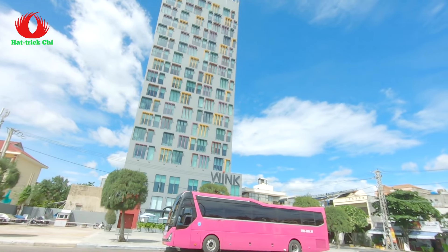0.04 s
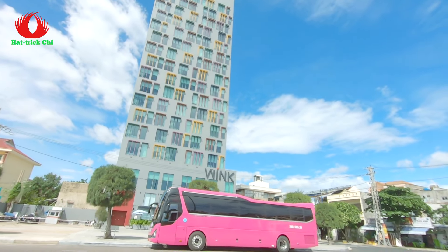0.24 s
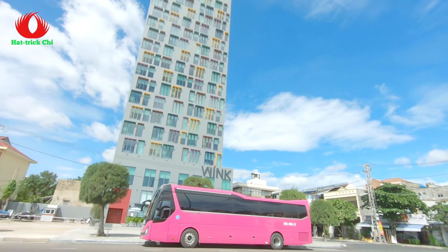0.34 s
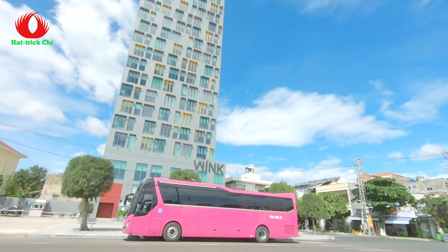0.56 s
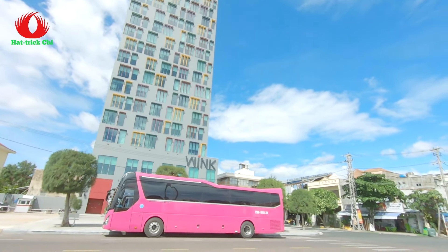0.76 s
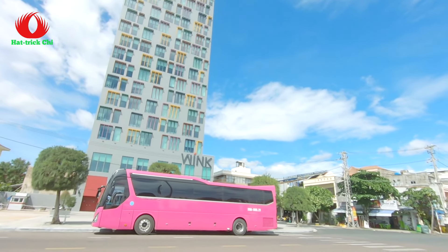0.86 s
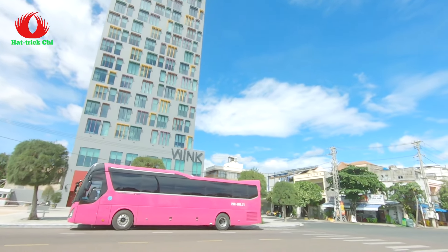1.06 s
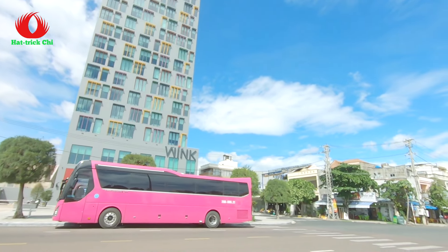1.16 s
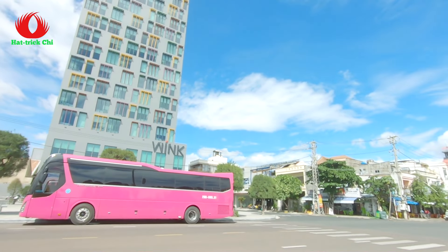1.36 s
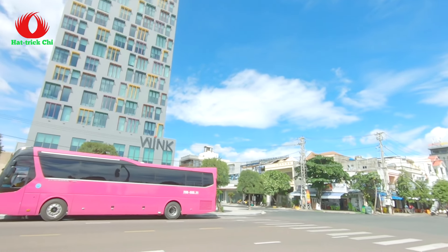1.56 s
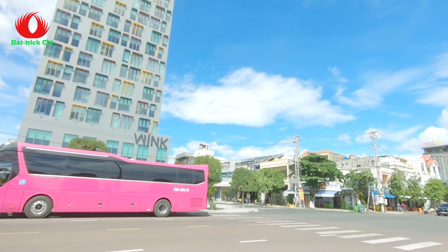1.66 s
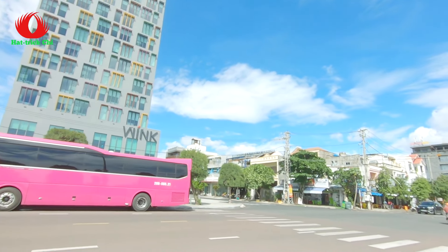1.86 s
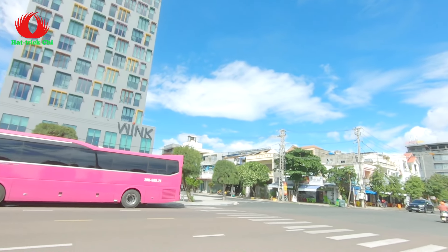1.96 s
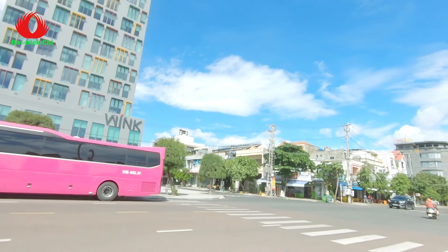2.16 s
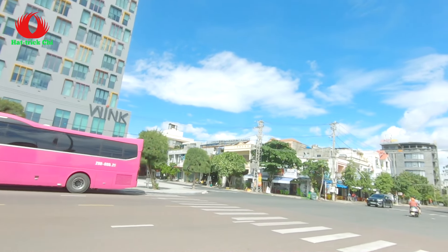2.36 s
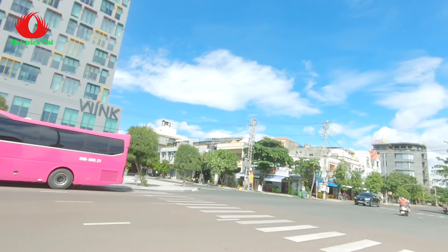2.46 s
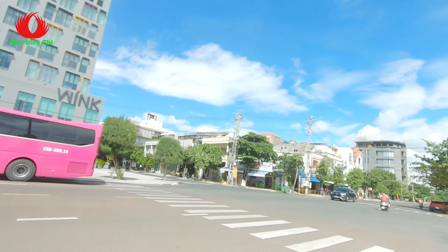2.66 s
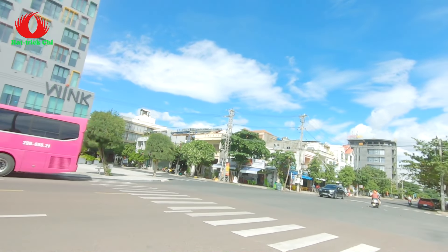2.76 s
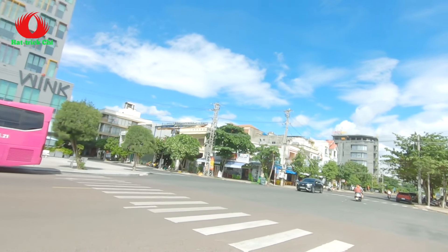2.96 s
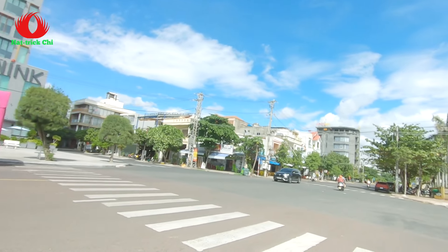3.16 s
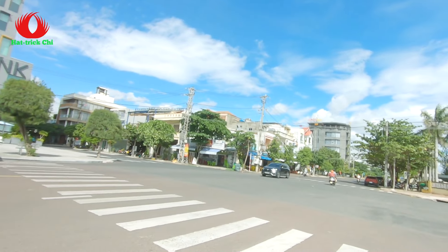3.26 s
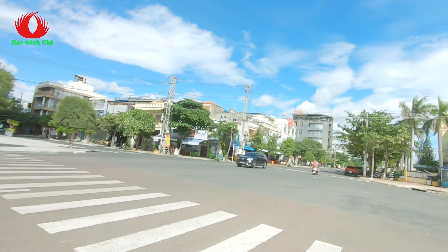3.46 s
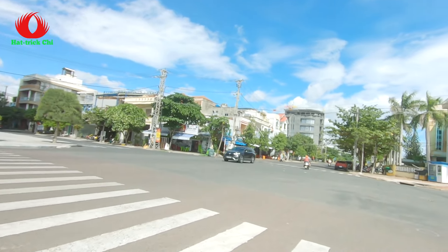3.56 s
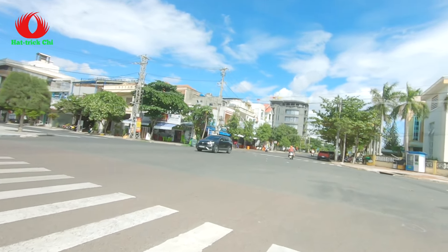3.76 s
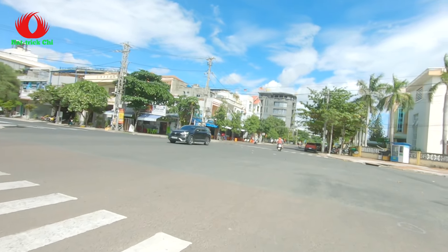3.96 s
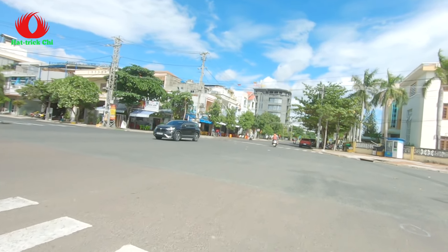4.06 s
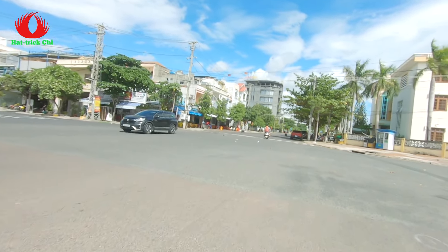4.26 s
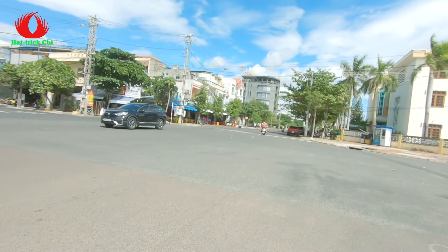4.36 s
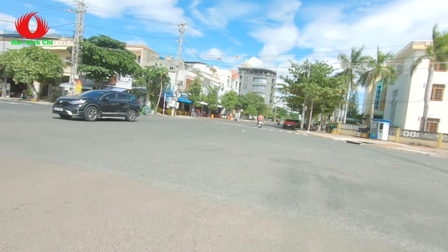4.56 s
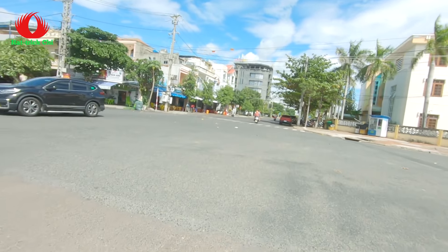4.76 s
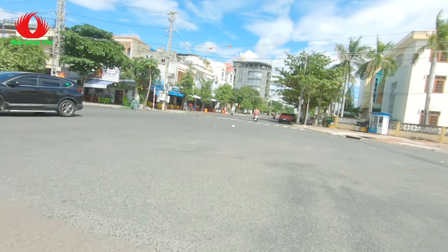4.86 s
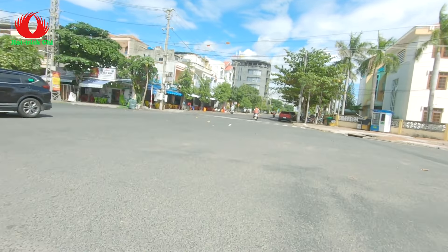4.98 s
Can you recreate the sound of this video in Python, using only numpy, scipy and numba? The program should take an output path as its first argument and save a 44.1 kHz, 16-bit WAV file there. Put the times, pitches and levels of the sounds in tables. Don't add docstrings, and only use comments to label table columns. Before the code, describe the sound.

Outdoors at a wide street crossing, a one-cylinder motorbike idles right beside a small camera microphone. Rapid low thumps, about twenty-one a second, carry valve clatter and thin chain hiss. Gusts slap and rumble over the microphone, ducking the engine. A tiny distant horn toot comes almost at once. The engine softens around one second, returns, shifts in brightness, dips near the end and swells again.

```python
import sys
import numpy as np
from scipy import signal
from scipy.fft import rfft, irfft, next_fast_len
from scipy.io import wavfile
from scipy.ndimage import uniform_filter1d
from numba import njit

SR = 44100
rng = np.random.default_rng(int(sys.argv[2]) if len(sys.argv) > 2 else 0)


def materialize(psi):
    bounded = np.clip(np.atleast_2d(psi).T, -1, 1)
    quanta = np.round(bounded * 32767).astype(np.int16)
    wavfile.write(sys.argv[1], SR, quanta)


def linear_from_db(decibels):
    return 10 ** (np.asarray(decibels, float) / 20)


N = 349713

# [t/s, firing rate/Hz]
FIRING_RATE = [(0.0, 21.0), (0.25, 21.43), (0.9, 21.13), (1.3, 20.95), (1.75, 21.02), (2.1, 20.66),
               (2.5, 20.94), (4.7, 21.03), (5.1, 21.32), (5.5, 21.65), (6.7, 21.75), (6.85, 21.52),
               (7.15, 20.53), (7.5, 20.98), (7.93, 20.48)]


def unit(x):
    return x / np.sqrt(np.mean(x ** 2))


def curves(table):
    s, *columns = np.transpose(table)
    return [np.interp(np.arange(N) / SR, s, c) for c in columns]


def spell(start, end, rise, fall):
    return np.interp(np.arange(N) / SR, [start - rise, start, end, end + fall], [0, 1, 1, 0])


def band(x, lo_hz, hi_hz, order=2):
    return signal.sosfilt(signal.butter(order, [lo_hz, hi_hz], "band", fs=SR, output="sos"), x)


def walk(rate):
    k = int(SR / rate)
    steps = np.repeat(rng.standard_normal(N // 150), k)[:N]
    return 0.75 * uniform_filter1d(uniform_filter1d(steps, k), k)


def flutter(rate):
    steps = walk(rate)
    return steps - uniform_filter1d(steps, size=SR // 5)


def patchy(spectrum, flicker_db, rate, ref_lo_hz, ref_hi_hz, count):
    size = next_fast_len(N)
    hz = np.arange(size // 2 + 1) * SR / size + 1e-3
    f, db = np.transpose(spectrum)
    colour = linear_from_db(np.interp(np.log(hz), np.log(f), db, left=-200))
    place = (count - 1) * np.log(hz / f[0]) / np.log(f[-1] / f[0])
    noise = rfft(rng.standard_normal(size)) * colour
    out = np.zeros(N)
    for k in range(count):
        share = np.clip(1 - abs(place - k), 0, 1)
        out += linear_from_db(flicker_db * walk(rate)) * irfft(noise * share, size)[:N]
    in_reference = (hz > ref_lo_hz) & (hz < ref_hi_hz)
    return out / np.sqrt(2 * np.sum(colour[in_reference] ** 2) / size)


def singing(modes, quick_db, slow_db):
    white = rng.standard_normal(N)
    out = np.zeros(N)
    for hz, w, db in modes:
        gain = linear_from_db(db + quick_db * walk(21.96) + slow_db * walk(0.83))
        out += gain * unit(band(white, hz - w / 2, hz + w / 2))
    return out


def burst(cycle, at, length, db, scatter_db):
    turn = cycle - at + .5
    size = linear_from_db(db + scatter_db * np.tanh(rng.standard_normal(N // 1000)))[turn.astype(int)]
    return size * np.exp(-.5 * ((turn % 1 - .5) / length) ** 2)


def nearness():
    # [t/s, valve level/dB, chain side facing/dB]
    engine = [(0, -40.5, 0.5), (.48, -39.5, -1), (.54, -43, -3), (1.15, -47, -2), (1.55, -44.5, -2),
              (2.0, -42.5, -2.5), (2.25, -39.5, -3), (3.05, -40, -1), (3.65, -39.5, -3.5),
              (3.75, -40.5, -3.5), (4.3, -43.5, -1.5), (4.65, -45, -2.5), (4.95, -40.5, -2),
              (5.15, -38, -3), (6.12, -38.5, -2.5), (6.22, -39.5, -4), (6.5, -42, -2), (7.3, -38.5, -2.5),
              (7.52, -47, -3.5)]
    level_db, facing_db = curves(engine)
    after_last_lean = np.clip(np.arange(N) / SR - engine[-1][0], 0, None)
    return level_db + 12 * after_last_lean, facing_db


def thump_db():
    sag = np.clip(-np.gradient(curves(FIRING_RATE)[0]) * SR - 1, 0, None)
    return nearness()[0] + 15.4 - 1.2 * uniform_filter1d(sag, size=8000)


def exhaust(cycle):
    # [multiple of the firing rate, level/dB]
    overtones = [(2, -20), (3, -19), (4, -4), (5, -1), (6, 0), (7, -3), (8, -13), (9, -19), (11, -21),
                 (12, -8), (13, -12), (14, -15), (15, -14), (16, -11), (17, -17), (18, -19), (22, -22)]
    turn = 2 * np.pi * (cycle + .03 + .002 * walk(12))
    pulse = np.zeros(N)
    for k, db in overtones:
        phase = -.7 if k < 10 else np.pi + .2 * (k - 10)
        pulse += linear_from_db(db) * np.cos(k * turn + phase)
    return unit(pulse) * linear_from_db(thump_db() + .8 + .9 * flutter(21))


def casing(cycle, shuts):
    # [f/Hz, level per Hz/dB]
    casing_colour = [(150, -37), (215, -52), (255, -7), (335, 1), (405, -3.5), (500, 0.5), (640, -4.5),
                     (830, -2), (1010, -4), (1110, -12), (1300, -11.5), (1700, -60)]
    # [f/Hz, width/Hz, level/dB]
    covers = [(498, 41, -20), (850.3, 56, -8), (928, 81, -11), (1334, 67, -18.5), (2143, 48, -22)]
    level_db, facing_db = nearness()
    drone = patchy(casing_colour, .8, 12, 600, 1100, count=6) + singing(covers, 3.0, 1.5)
    swell = .88 + shuts * .8 + .11 * np.cos(2 * np.pi * (cycle - .42))
    return linear_from_db(level_db + 5.8 - 0.61 * facing_db) * drone * swell


def valves(opens, shuts, fires):
    # [f/Hz, level per Hz/dB]
    valve_colour = [(620, 1.5), (1050, -14), (1120, -48), (1330, -2), (1540, -5), (1830, -3.5), (2190, -10),
                    (2420, -13), (2640, -13.5), (2880, -15), (3150, -15.5), (3760, -22.5), (4080, -23),
                    (4430, -31), (4710, -33), (5400, -34), (7020, -58), (11900, -120)]
    clatter = patchy(valve_colour, 0.99, 21.14, 1150, 2320, count=7)
    seating = 1.3 * shuts * band(clatter, 2900, 6000)
    return linear_from_db(nearness()[0]) * (clatter * (.82 + .8 * opens + .75 * fires) + seating)


def chain(opens, fires):
    # [f/Hz, level per Hz/dB]
    hiss_colour = [(2760, -40), (4700, -37), (5190, -10.5), (6290, 3.5), (6920, -1), (7230, 2.5),
                   (7500, -4.5), (7780, -2), (8990, -4), (9800, -20), (12700, -35), (21600, -120)]
    # [f/Hz, width/Hz, level above hiss/dB]
    link_modes = [(6525, 70, -8), (6680, 90, -13), (7310, 110, -8), (9080, 120, -13), (9910, 60, -22),
                  (11510, 160, -15), (13030, 120, -18)]
    # [f/Hz, level per Hz/dB]
    top_colour = [(5590, -39), (9500, 1), (10300, -2.5), (11300, 4.5), (12100, -5), (12900, 4.5),
                  (13600, -7), (13800, -7), (14700, -2), (15500, -11)]
    # [start t/s, end t/s, level/dB]
    shades = [
        (0, .5, -1.5),
        (.55, .95, -2),
        (2.5, 3.7, 0.5),
        (7.0, 7.6, 0.5),
        (3.75, 4.35, -1),
        (6.17, 6.55, -1.5),
    ]
    level_db, facing_db = nearness()
    shake = linear_from_db(1.5 * flutter(70) + 1.8 * flutter(24))
    hiss = patchy(hiss_colour, 0.34, 28, 6280, 8700, count=5) * (.88 + .45 * opens + .3 * fires)
    links = singing(link_modes, 3.5, 2.5) * (.8 + .5 * opens)
    shade_db = sum(db * spell(a, b, .03, .08) for a, b, db in shades)
    top = patchy(top_colour, 1.5, 1.6, 9900, 15000, count=8) * linear_from_db(shade_db)
    top = top * (.85 + .75 * opens + .6 * fires)
    top_db = -6 - 1.44 * facing_db
    return linear_from_db(level_db - 15 + facing_db) * shake * (hiss + links + linear_from_db(top_db) * top)


def rattle(cycle):
    opens = burst(cycle, .27, .055, -3.5, 2.5)
    shuts = burst(cycle, .57, .05, -7, 4.0)
    fires = burst(cycle, .96, .04, -8, 3.0)
    return casing(cycle, shuts) + valves(opens, shuts, fires) + chain(opens, fires)


def rings(cycle):
    # [f/Hz, width/Hz, level above valves/dB]
    plate_modes = [(455, 9, -6), (330, 10, -3), (2140, 110, -14), (2310, 80, -16), (3350, 110, -25),
                   (3990, 100, -26.5)]
    swell = .7 + burst(cycle, .3, .07, -1, 3.0)
    plates = swell * singing(plate_modes, 2.0, 2.0)
    tick = burst(cycle, .3, .06, -22, 2.5) * spell(1.5, 4.7, .3, .2)
    tappet = tick * singing([(9200, 500, 0)], .5, .5)
    return linear_from_db(nearness()[0]) * (plates + tappet)


def glints(cycle):
    # [start t/s, end t/s, f/Hz, width/Hz, level above valves/dB]
    facing_parts = [(0, .8, 7250, 400, -21), (.5, .85, 7600, 1600, -24), (6.2, 7.0, 4300, 500, -27),
                    (0, .5, 8500, 1300, -27), (1.5, 3.7, 7270, 100, -28), (2.1, 2.9, 6250, 500, -26),
                    (3.9, 4.7, 6300, 700, -25), (4.95, 5.45, 7300, 200, -25), (5.45, 6.2, 6250, 450, -22),
                    (6.25, 6.7, 7300, 400, -25), (1.3, 2.6, 11200, 900, -26), (1.1, 2.0, 14600, 1700, -31),
                    (3.5, 4.6, 10000, 700, -30), (4.2, 4.9, 11500, 1200, -29), (5.3, 5.9, 12700, 500, -30),
                    (6.0, 6.8, 14600, 1800, -30), (6.25, 6.95, 11600, 1300, -29),
                    (6.45, 7.0, 4600, 900, -30), (5.05, 5.3, 3400, 80, -22), (5.3, 6.2, 3970, 50, -26),
                    (5.6, 6.2, 2350, 100, -14), (5.25, 5.75, 850, 70, -1), (5.1, 5.4, 2695, 50, -19),
                    (6.62, 6.7, 2700, 40, -15), (.3, .5, 850, 80, -2), (2.2, 2.7, 850, 70, -3),
                    (6.9, 7.35, 860, 80, -3)]
    throb = .75 + burst(cycle, .28, .07, -2, 3.0)
    white = rng.standard_normal(N)
    parts = np.zeros(N)
    for a, b, hz, w, db in facing_parts:
        parts += linear_from_db(db) * spell(a, b, 0.074, .1) * unit(band(white, hz - w / 2, hz + w / 2))
    return linear_from_db(nearness()[0]) * throb * parts


def whine(cycle):
    # [start t/s, end t/s, level/dB]
    mesh = [
        (2.1, 3.7, 2),
        (4.1, 4.5, 3.5),
        (4.85, 6.0, 7.5),
        (6.1, 7.35, 6.5),
    ]
    ring_db = nearness()[0] - 23 + sum(db * spell(a, b, 0.057, 0.048) for a, b, db in mesh)
    stroke_db = .5 + 5 * np.cos(2 * np.pi * (cycle - .12)) + 1.6 * flutter(24)
    pitch_hz = 2735 + 18 * walk(2) + 16 * np.sin(2 * np.pi * cycle)
    tone = 1.2 * np.sin(2 * np.pi * np.cumsum(pitch_hz) / SR)
    return linear_from_db(ring_db + stroke_db + 1.6) * (tone + .3 * singing([(2738, 46, 0)], .6, 0))


def gusts():
    # [start t/s, length/s, level/dB, chest part above it/dB]
    blows = [(0, 0.077, -22.5, -5), (0.104, 0.14, -27, 9.5), (0.413, 0.031, -25, -4),
             (0.499, 0.094, -19, 5), (0.634, 0.17, -23.5, 4), (0.854, 0.067, -30, 6),
             (0.952, 0.093, -24, -10), (1.105, 0.28, -40, 19), (1.403, 0.069, -21.5, 2),
             (1.6, 0.026, -31, 0), (1.748, 0.061, -34, 0), (2.283, 0.047, -36, 11),
             (2.733, 0.21, -36.5, 11), (2.91, 0.16, -23, -12), (3.077, 0.2, -25, 1), (3.4, 0.16, -30, 7),
             (3.735, 0.17, -31, 12.5), (3.928, 0.11, -27, 11), (4.06, 0.036, -28.5, 2),
             (4.13, 0.08, -29.5, 9), (4.363, 0.051, -28, -3), (4.814, 0.063, -26, 6.5),
             (4.938, 0.12, -28.5, 6), (5.126, 0.4, -29, -5), (5.59, 0.098, -31, -2),
             (6.017, 0.069, -25.5, 3), (6.137, 0.13, -23, -3), (6.323, 0.19, -25, -0.5),
             (6.696, 0.36, -42, 8), (7.008, 0.087, -23.5, -4), (7.145, 0.23, -24.5, 3.5)]
    # [start t/s, end t/s]
    lulls = [
        (1.85, 2.7),
        (7.47, 8.1),
    ]
    # [start t/s, end t/s, upper part more/dB, deep part more/dB]
    edge_on = [
        (0.103, 0.454, 4.5, 7),
        (0.754, 1.5, -2, 2),
        (2.75, 3.298, 4.5, 4),
        (3.5, 4.246, 5, 8),
        (6.15, 6.433, 1.5, 8),
        (6.75, 7.4, 1.5, -1),
        (7.497, 8.1, -6, -5),
    ]
    lee = sum(spell(a, b, 0.035, 0.074) for a, b in lulls)
    breeze = linear_from_db(2 * (-32.5 - 7 * lee))
    blown = [linear_from_db(2 * db) * spell(s, s + length, 0.027, 0.026) ** 2 for s, length, db, _ in blows]
    power = breeze + sum(blown)
    level_db = 10 * np.log10(power)
    chest_db = (10 * breeze + sum(p * row[3] for p, row in zip(blown, blows))) / power
    upper_db, deep_db = sum(np.outer(more_db, spell(a, b, 0.13, 0.088)) for a, b, *more_db in edge_on)
    deep_db = deep_db - 12 + 0.12 * chest_db - 0.48 * (level_db + 33.0)
    upper_db = upper_db - 2 - 0.66 * (level_db + 30.5)
    return level_db, deep_db, upper_db, chest_db


def wind():
    # [f/Hz, level per Hz/dB]
    wind_colour = [(13, -47), (22, -13), (81, -1.5), (129, -1), (171, -5), (219, -6.5), (313, -7.5),
                   (539, -18.5), (583, -13), (681, -29.5), (900, -23), (1170, -30), (1980, -120)]
    # [t/s, peak level/dB, f/Hz]
    buffets = [(0.097, -23, 169), (.179, -14, 187), (.268, -14, 150), (.8, -8, 200), (.952, -15, 111),
               (1.04, -12, 130), (1.064, -18, 128), (1.259, -14.5, 110), (1.414, -17, 178),
               (1.631, -20, 221), (2.869, -19, 153), (2.904, -16, 199), (3.734, -14, 195),
               (3.916, -5.5, 127), (4.115, -10, 110), (4.354, -24, 219), (4.823, -16, 170),
               (5.567, -15, 127), (6.067, -15, 219), (6.127, -12, 152), (6.193, -4, 215), (6.226, -19, 121),
               (6.521, -15, 98), (6.768, -25, 245), (7.081, -15, 211), (7.162, -7, 203), (7.249, -25, 170),
               (7.355, -23, 182), (0.456, -4.5, 124), (0.491, -7, 149), (0.507, -7, 155), (0.53, -3, 156),
               (0.548, -10, 165), (0.695, -20, 130), (0.791, -14, 123), (0.81, -10.5, 99),
               (1.431, -19, 190), (1.606, -17, 131), (3.794, -4, 121), (4.011, -9, 119), (4.084, -4, 95),
               (4.177, -13, 127), (4.21, -6.5, 151), (4.228, -5, 118), (4.248, -7, 211), (4.792, -27, 123),
               (6.182, -5, 129), (6.299, -11, 233), (6.37, -1, 116), (6.389, -16, 99), (7.199, -14, 174)]
    level_db, deep_db, upper_db, chest_db = gusts()
    eddies = patchy(wind_colour, 1.0, 20, 165, 251.5, count=5) * linear_from_db(1.4 * flutter(35))
    deep, low, mid = (signal.sosfiltfilt(signal.butter(3, hz, fs=SR, output="sos"), eddies)
                      for hz in (68, 158, 260))
    upper = linear_from_db(upper_db + np.clip(0.3 * (level_db + 25.5), -9, 0)) * (eddies - mid)
    chest = linear_from_db(chest_db - 7.5 + np.clip(level_db + chest_db + 41, -5, 0)) * (low - deep)
    rumble = linear_from_db(deep_db + 6.0) * deep + chest + (mid - low) + upper
    out = rumble * linear_from_db(level_db - 0.34)
    t = np.arange(SR // 20) / SR
    for s, db, hz in buffets:
        i = int(s * SR)
        swing = 2 * np.pi * hz * t * (1.15 - 7 * t)
        slap = np.sin(swing) + .38 * np.sin(2 * swing)
        swell = t * hz / .75
        out[i:i + len(t)] += linear_from_db(db) * slap * swell ** 2 * np.exp(2 - 2 * swell)
    return out


def rung(hits, more_db, t60):
    out, t = np.zeros(N + SR), np.arange(SR // 20) / SR
    for s, db, hz in hits:
        i = int(s * SR)
        decay = linear_from_db(db + more_db - 60 * t / t60)
        out[i:i + len(t)] += decay * np.sin(2 * np.pi * hz * t) * np.clip(t * hz, 0, 1)
    return out[:N]


def knocks():
    # [t/s, peak level/dB, f/Hz]
    snaps = [(0.044, -14, 274), (0.331, -12, 401), (0.419, -14, 269), (0.531, -13, 353), (0.679, -22, 336),
             (0.752, -21, 296), (0.794, -10.5, 291), (0.952, -16, 272), (1.04, -18, 250), (1.066, -20, 256),
             (1.169, -23, 258), (1.198, -18, 283), (1.262, -18, 285), (1.318, -18, 280), (1.601, -19, 261),
             (1.971, -23, 283), (2.123, -26, 347), (2.811, -13, 550), (2.871, -16, 342), (2.903, -10, 280),
             (3.577, -13, 304), (3.733, -16, 250), (3.8, -17, 285), (3.827, -21, 266), (3.851, -21, 288),
             (3.919, -17, 272), (3.945, -12, 266), (4.248, -12, 277), (4.301, -21, 315), (4.352, -22, 261),
             (4.873, -25, 326), (5.098, -17, 320), (5.199, -14, 299), (5.26, -20, 269), (5.388, -17, 252),
             (5.461, -19, 336), (5.566, -23, 312), (5.614, -13, 269), (5.666, -17, 338), (6.015, -14, 320),
             (6.062, -16, 315), (6.127, -20, 250), (6.221, -16, 250), (6.299, -10, 260), (6.496, -19, 264),
             (6.633, -21, 277), (6.768, -17, 250), (6.917, -16, 334), (7.038, -16, 261), (7.136, -14, 320)]
    # [t/s, peak level/dB, f/Hz]
    high_knocks = [(0.178, -16, 415), (0.254, -21, 417), (0.285, -16, 810), (0.491, -15, 517), (0.507, -18, 401),
                   (0.531, -18, 412), (0.794, -17, 401), (1.004, -25, 412), (1.199, -21, 458), (1.269, -27, 447),
                   (1.424, -25, 425), (1.482, -22, 476), (3.019, -16, 495), (3.921, -15, 415), (4.244, -18, 425),
                   (5.418, -7, 850), (6.126, -19, 401), (6.299, -22, 401)]
    return rung(snaps, -0.5, t60=0.043) + rung(high_knocks, -6, t60=.035)


def horn():
    # [f/Hz, level/dB, start t/s, end t/s]
    partials = [(2740, -37, .337, .379), (3036, -42, .344, .388), (3138, -34.5, .342, .391),
                (3521, -39, .338, .379), (3914, -35, .337, .380)]
    t = np.arange(N) / SR
    toot = np.zeros(N)
    for hz, db, a, b in partials:
        gain = linear_from_db(db + 1.2 - 60 * (t - .36) + 3.2 * walk(200))
        gate = np.clip(np.minimum(t - a, .5 * (b + .004 - t)) / .004, 0, 1)
        toot += gain * np.sin(2 * np.pi * hz * t) * gate
    toot += linear_from_db(-57) * np.sin(2 * np.pi * 4305 * t) * spell(.34, .376, .003, .003)
    toot += linear_from_db(-37) * np.sin(2 * np.pi * 3925 * t) * spell(.341, .347, .003, .005)
    return toot + linear_from_db(-24) * np.roll(toot, int(.035 * SR)) + linear_from_db(-27) * np.roll(toot, int(.062 * SR))


def scene():
    # [t/s, depth level/dB, half length/s]
    dips = [(.527, -7, .006), (.797, -7, .007), (1.45, -5, .004), (1.592, -22, .003), (3.171, -7, .003),
            (3.75, -7, .003), (4.203, -8, .006), (4.25, -5, .005), (6.306, -9, .004), (6.35, -6, .003),
            (6.396, -20, .003), (6.627, -5, .003), (6.872, -5, .003)]
    t = np.arange(N) / SR
    cycle = .16 + np.cumsum(curves(FIRING_RATE)[0]) / SR
    dip_gain = linear_from_db(sum(db * np.exp(-((t - s) / half) ** 2) for s, db, half in dips))
    engine = exhaust(cycle) + rattle(cycle) + rings(cycle) + glints(cycle) + whine(cycle)
    return (dip_gain * (engine + horn()) + wind() + knocks())[None]


@njit
def limiter(x, top, ratio, attack, release):
    gain, e = np.ones(len(x)), 0.
    for i in range(len(x)):
        e += (abs(x[i]) - e) * (attack if abs(x[i]) > e else release)
        if e > top:
            gain[i] = (top / e) ** (1 - 1 / ratio)
    return gain


def low_pass(x):
    return signal.sosfilt(signal.butter(12, 15710, fs=SR, output="sos"), x)


def record(dry):
    port = signal.sosfilt(signal.butter(2, 42, "high", fs=SR, output="sos"), dry)
    gain = uniform_filter1d(limiter(port[0], .38, 12., .08, .0025), size=120)
    ahead = np.roll(uniform_filter1d(gain, size=90), -60)
    held = ahead * port * np.clip(np.arange(N) / 130, 0, 1)
    return low_pass(0.73 * np.tanh(held / 0.8))


dry = scene()
out = record(dry)
materialize(out)
```